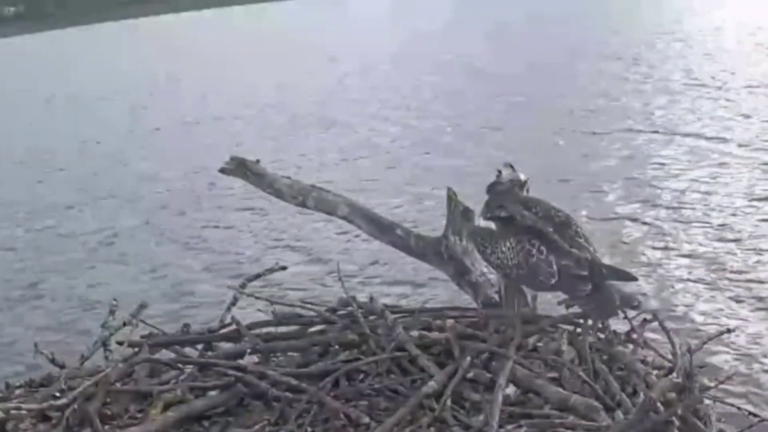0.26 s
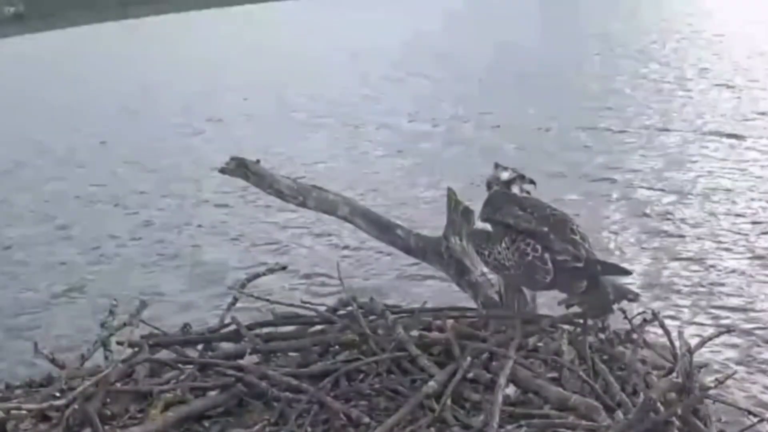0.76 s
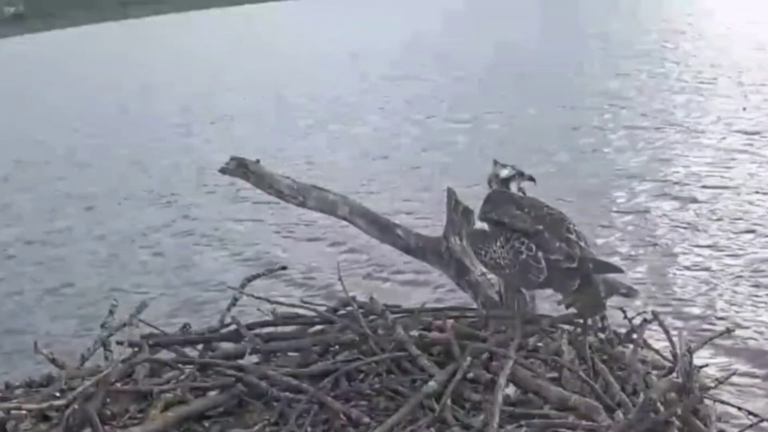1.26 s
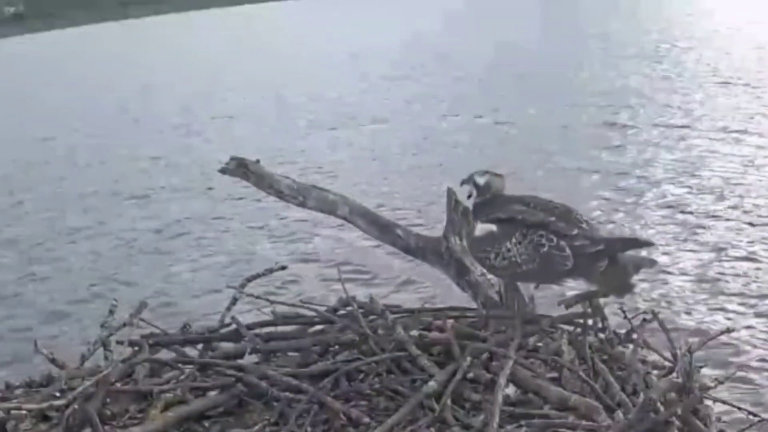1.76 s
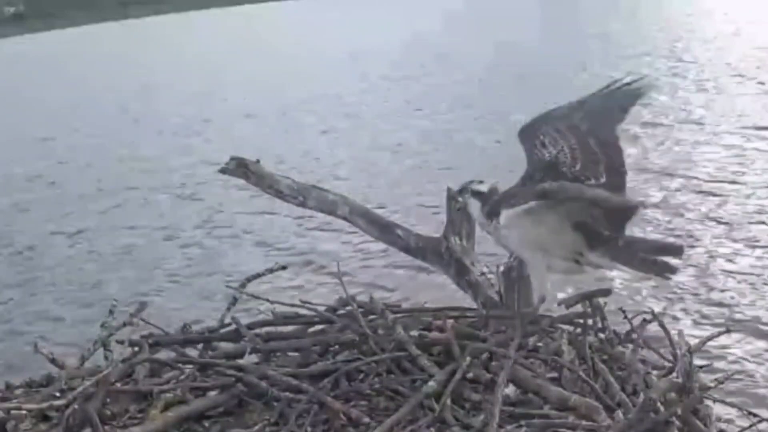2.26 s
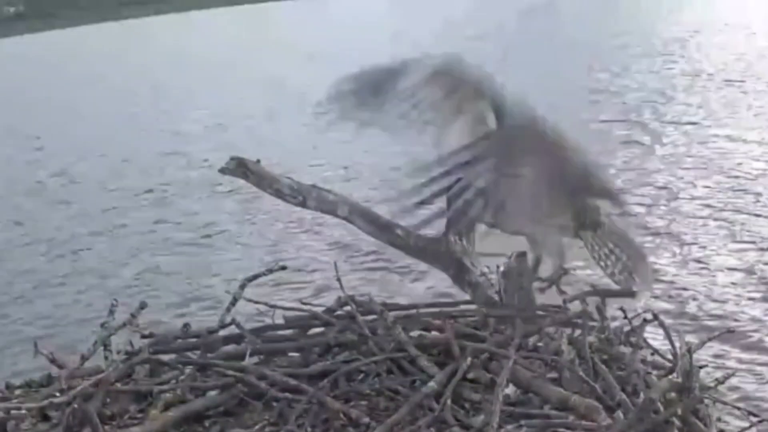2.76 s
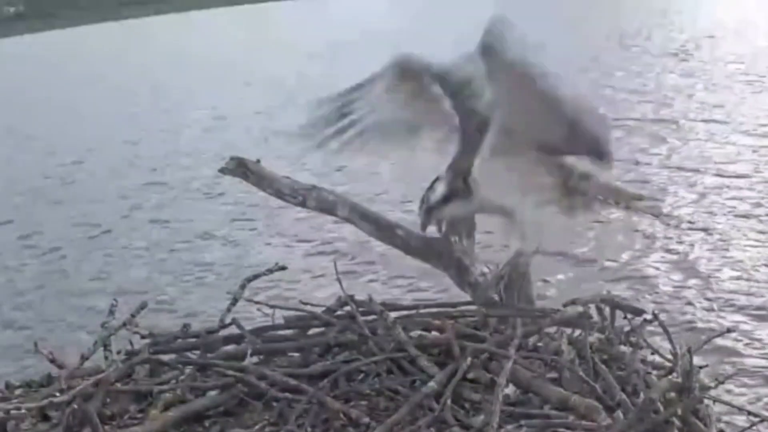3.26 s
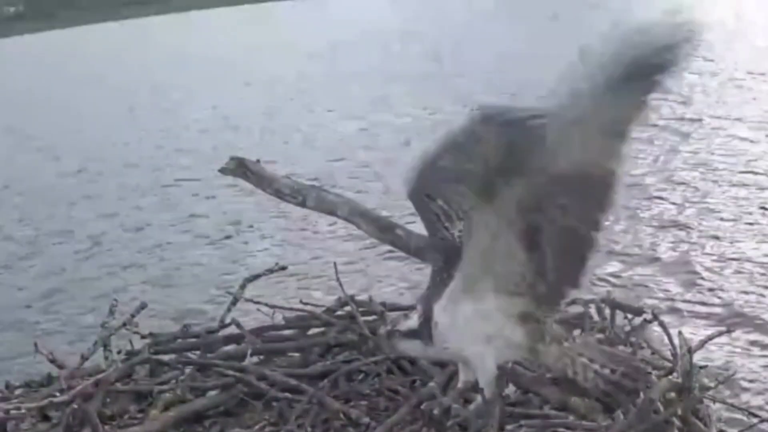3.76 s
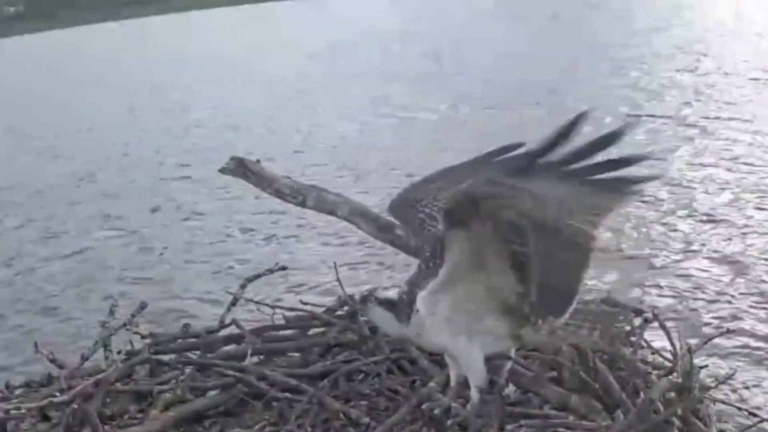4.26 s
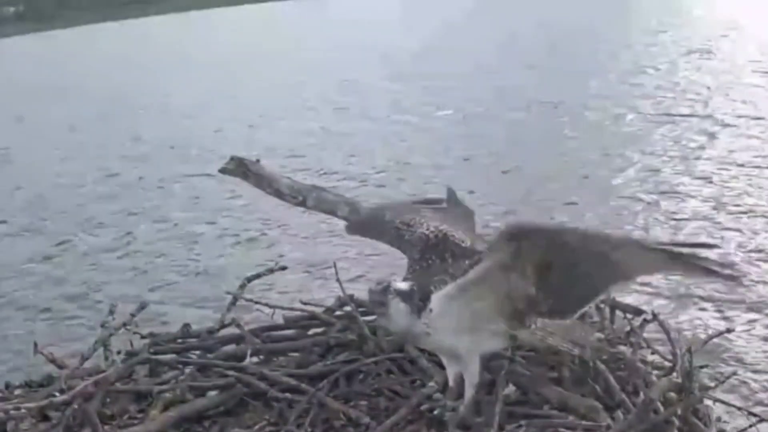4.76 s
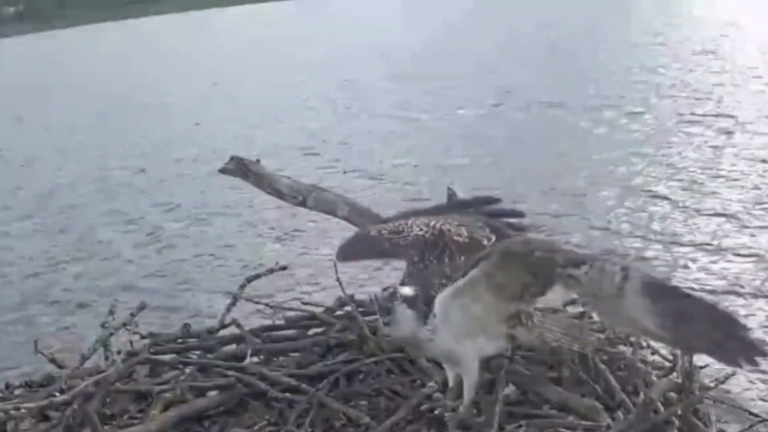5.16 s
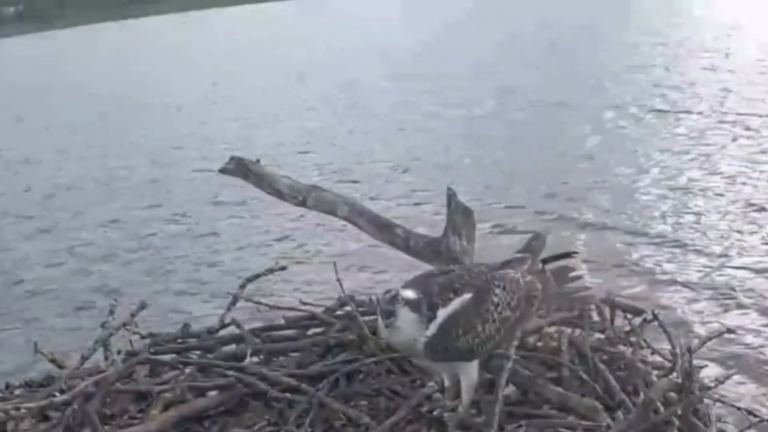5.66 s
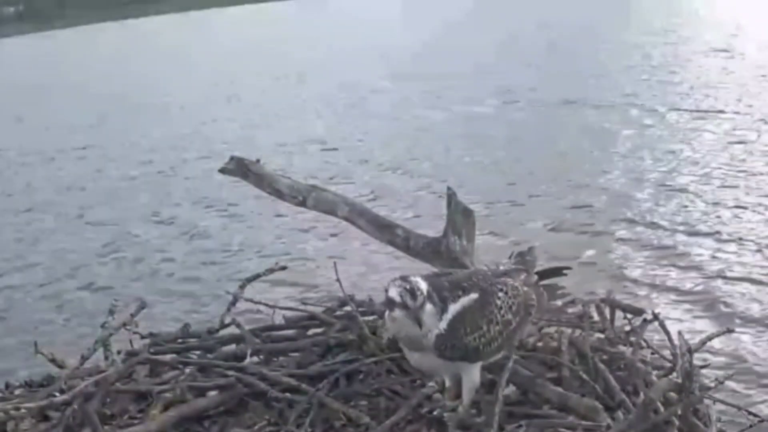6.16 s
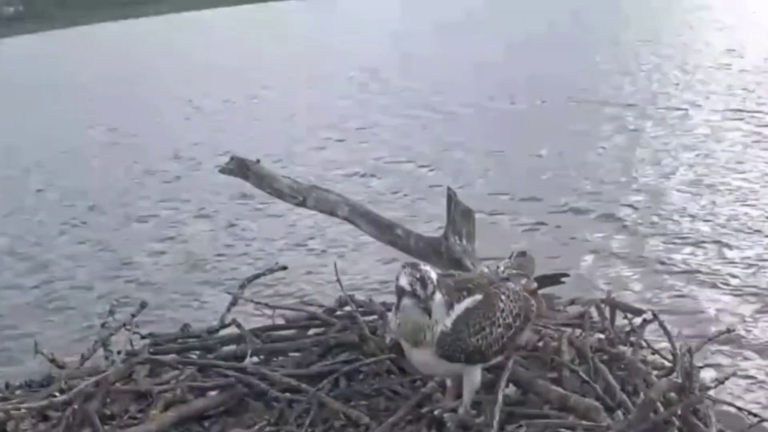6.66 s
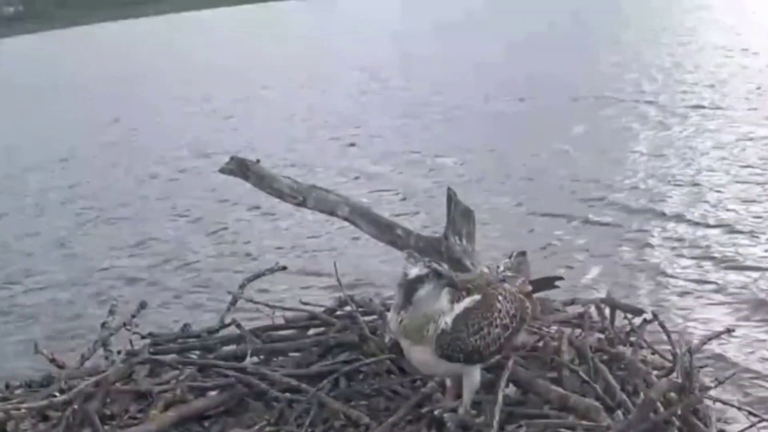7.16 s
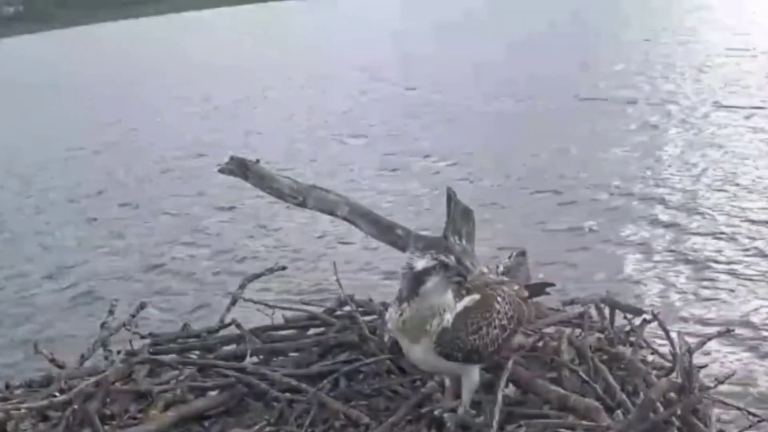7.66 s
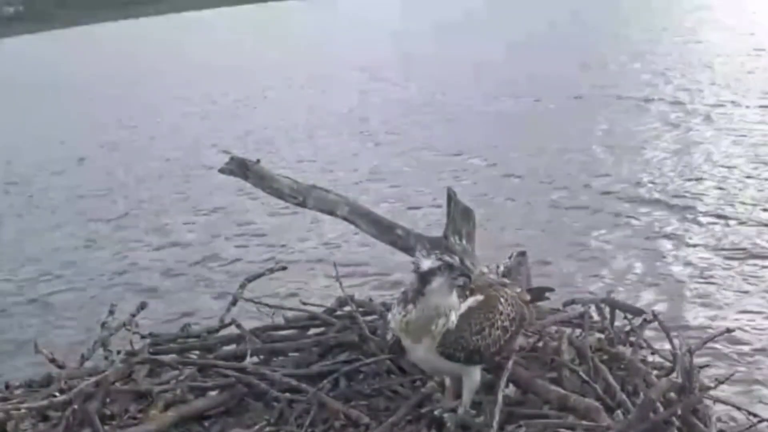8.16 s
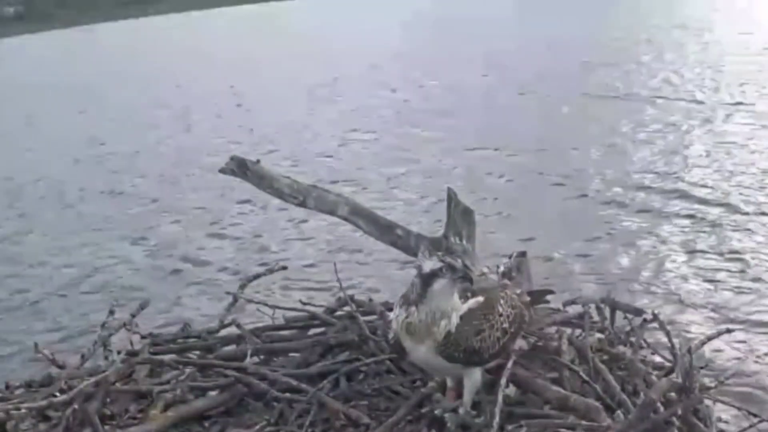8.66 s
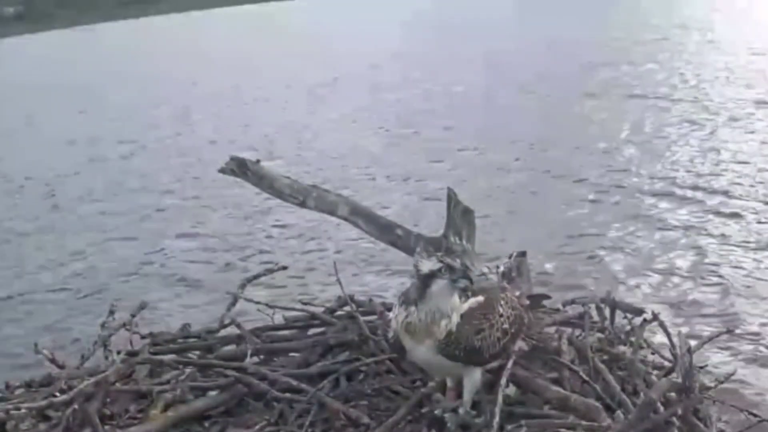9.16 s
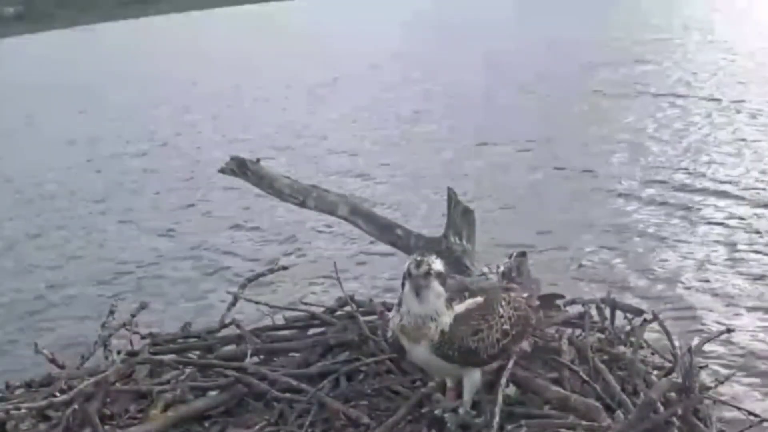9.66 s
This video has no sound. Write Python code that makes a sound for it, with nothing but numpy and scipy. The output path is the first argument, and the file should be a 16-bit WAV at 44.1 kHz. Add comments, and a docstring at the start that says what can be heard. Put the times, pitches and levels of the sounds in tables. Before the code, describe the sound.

Steady, lumpy wind rumble on an outdoor microphone underlies a fish hawk's rapid chirping whistles, each rising slightly and hooking down with a throaty rasp. The calls strengthen through a flurry of movement, then cease, leaving wind, dry twig clicks, light rustle and tiny drips. Near the end come three lower whistles, a gap, and two more. The sound is dry and open, with barely any echo.

```python
"""A stick nest above a lake, where a fish hawk gives runs of short whistled calls close to the microphone.
Its two-sided voice box is additive: phase-driven sines for a main and a second higher whistle, their
sum and difference tones, and narrow noise for a husky low side, with short slides and a throat rasp.
Sticks tick as modal resonators, drops and small bubbles plop as rising glides, feathers and twigs rustle
as clumped clicks, and wind rumbles on the microphone as flickering bands of noise."""
import sys
import numpy as np
from scipy import signal
from scipy.io import wavfile
from scipy.ndimage import uniform_filter1d

SR = 44100
rng = np.random.default_rng(int(sys.argv[2]) if len(sys.argv) > 2 else 0)


def int16_out(signal):
    """Quantize to a 16-bit WAV file."""
    q = np.round(np.clip(np.atleast_2d(signal).T, -1, 1) * 32767)
    wavfile.write(sys.argv[1], SR, q.astype(np.int16))


N = 436149
TIME = np.arange(N) / SR

# Envelope of a whistle: depth below the held level at the start and end, and their times
ATTACK_DB, RELEASE_DB = 32, 37.5
ATTACK_S, RELEASE_S = 0.012, 0.033
# The opening scoop settles; the fall steepens as a power and ends this long before the arch does
SCOOP_S, FALL_BEND, HOOK_LEAD_S = 0.018, 1.5, .012
# Reference heights of the whistles that scale the other partials
MAIN_REFERENCE_DB, EFFORT_REFERENCE_DB = -44.5, -35.5

# Main whistle in arched pieces, one to most calls; a call whose pitch breaks takes three:
#   [onset t/s, climb t/s, fall t/s, opening scoop f/Hz, shoulder f/Hz,
#   crest f/Hz, last f/Hz, shoulder level/dB, crest level/dB, hook level/dB,
#   husky band level/dB and octave overtone level/dB, both before they follow the whistles]
MAIN_ARCHES = [ (0.0, 0.1, 0.085, 25, 2834, 2960, 2825, -58, -61, -57, -59.5, -65),
               (0.355, 0.18, 0.072, 60, 2770, 2977, 2893, -53.5, -52, -53, -57, -45),
               (.802, 0.17, 0.085, 114, 2760, 2935, 2710, -47.5, -50.5, -53.5, -59, -52),
               (1.195, 0.14, 0.052, 60, 2736, 2842, 2652, -44, -45.5, -40.5, -63, -61),
               (1.52, 0.16, 0.067, 160, 2708, 2790, 2707, -39.5, -47, -42.5, -61.5, -63),
               (1.88, .12, .045, 126, 2698, 2932, 2773, -65, -50.5, -46, -52, -57),
               (2.2, 0.1, 0.059, 85, 2682, 2830, 2800, -56, -51, -50, -52.5, -46),
               (2.497, 0.1, 0.073, 47, 2721, 2921, 2899, -44, -43.5, -37.5, -55.5, -65),
               (2.805, 0.078, 0.099, 370, 2910, 2955, 2868, -45.5, -28, -30, -83, -64.5),
               (3.128, 0.059, 0.081, 90, 2496, 2780, 2745, -38.5, -32, -34, -83, -62.5),
               (3.374, 0.069, 0.054, 200, 2800, 2860, 2784, -39, -39, -30, -53, -55.5),
               (3.617, 0.1, 0.083, 59, 2936, 3019, 2865, -33.5, -38, -40, -54, -55.5),
               (3.926, 0.13, 0.023, 420, 2885, 3170, 3160, -40.5, -34, -32, -53, -61),
               (4.074, 0.014, 0.029, 20, 2706, 2750, 2794, -17, -26.5, -40, -76, -57),
               (4.113, 0.0037, 0.075, 10, 3118, 3083, 2770, -48, -27.5, -43, -63, -60),
               (4.39, 0.17, 0.066, 560, 2878, 2968, 2745, -42, -37, -40, -54.5, -60.5),
               (4.788, 0.17, 0.049, 360, 2748, 2957, 2940, -39.5, -39, -29, -54, -59),
               (5.132, 0.13, 0.073, 400, 2898, 2990, 2804, -38, -34.5, -32, -52, -59.5),
               (5.446, 0.12, 0.072, 130, 2881, 2970, 2725, -33.5, -31, -37.5, -53.5, -59.5),
               (5.751, 0.11, 0.082, 92, 2800, 3032, 2804, -31.5, -37, -37, -55, -61),
               (6.056, 0.12, 0.062, 180, 2772, 2973, 2740, -36, -30, -36.5, -53.5, -57),
               (7.959, 0.14, 0.084, 56, 2218, 2652, 2444, -50, -34, -41.5, -60.5, -66.5),
               (8.443, 0.14, 0.076, 420, 2526, 2697, 2415, -34, -40.5, -38, -59.5, -67.5),
               (8.833, 0.13, 0.054, 600, 2637, 2676, 2374, -32.5, -40.5, -32, -59.5, -69),
               (9.493, .16, 0.071, 350, 2515, 2685, 2513, -34, -42, -34.5, -60.5, -67),
               (9.847, 0.073, 0.053, 380, 2596, 2760, 2570, -26, -44, -35, -58, -78)]
# The main whistle catches or flares: [middle t/s, length t/s, level change/dB, pitch pull f/Hz]
MAIN_CATCHES = [(3.24, .02, 2, 0.5), (.368, 0.032, 14, -34), (.82, 0.036, 6, -4), (.91, 0.077, -17, -30.5),
                (1.285, 0.024, -6, 4), (1.67, 0.026, -18, 1), (2.55, .08, -17, -60),
                (2.845, 0.032, 8.5, 34.5), (3.17, 0.012, -13, -0.5), (3.46, 0.032, -8.5, -0.5),
                (3.65, .04, 6.5, -7.5), (3.68, 0.019, -6, -0.5), (4.49, 0.029, -6, 0.5), (4.565, .05, 4, 0),
                (4.88, .035, -3, -22), (4.91, .04, 3.5, 9.5), (4.943, 0.033, -5, 112),
                (5.21, 0.093, 5, 3.5), (5.265, 0.051, -8, -3.5), (5.475, 0.016, -8, -1.5),
                (5.545, .03, -5, -3.5), (5.795, 0.022, -9, 4), (5.865, 0.072, -9, 69),
                (5.895, 0.018, 10, 2.5), (6.11, 0.018, -12, 5.5), (8.03, 0.027, -15, 1),
                (8.11, 0.038, -6, 44.5), (8.142, 0.018, 13, 0.5), (8.61, 0.022, -5, 3),
                (8.624, 0.0085, 10, -5), (8.977, 0.01, -12, -3.5), (8.986, 0.0098, 5.5, -7.5),
                (9.605, 0.025, 8, -6)]


def main_voice():
    """Frequency integration: arched pitch tracks give the main phase, its height and the upper-partial data."""
    arches = [arch(*row) for *row, husky_db, octave_db in MAIN_ARCHES]
    *_, husky_db, octave_db = np.transpose(MAIN_ARCHES)
    phase, height = voice(arches, waver=0.0036, catches=MAIN_CATCHES)
    husk = sum(from_db(level_db) * sounding(piece) for piece, level_db in zip(arches, husky_db))
    octave = sum(from_db(level_db) * sounding(piece) for piece, level_db in zip(arches, octave_db))
    sunk_hz = 0   # distance below the highest pitch so far in the arch
    for piece in arches:
        below_hz = np.maximum.accumulate(piece[:, 1]) - piece[:, 1]
        sunk_hz = sunk_hz + sounding(piece) * np.interp(TIME, piece[:, 0], below_hz)
    return phase, height, husk, octave, sunk_hz


def main_whistle(main, main_height, high_height):
    """Amplitude modulation: an uneven sine with a breathy edge that swells as the high whistle drowns it."""
    flutter, breath_db, breath_hz, break_up_db = .15, -23, 110, 24
    tone = main_height * (1 + flutter * drift(57)) * np.sin(main)
    drowned = high_height / (high_height + main_height + 1e-9)   # share of the high whistle
    edge = from_db(breath_db + break_up_db * drowned) * main_height * noisy_tone(main, breath_hz)
    return tone + edge


# Second, higher whistle, a slow climb: [onset t/s, length t/s, first f/Hz before the scoop, crest f/Hz,
#   early level/dB, late level/dB]
HIGH_WHISTLES = [(0.0, 0.2, 3500, 3580, -47.5, -51.5), (0.347, 0.25, 3445, 3625, -55.5, -51.5),
                 (0.807, 0.23, 3500, 3600, -50.5, -51), (1.181, 0.21, 3470, 3606, -60.5, -53.5),
                 (1.537, 0.12, 3560, 3510, -58.5, -56.5), (1.642, 0.075, 3630, 3650, -48.5, -50),
                 (1.874, 0.18, 3480, 3690, -55.5, -53.5), (2.186, 0.17, 3570, 3680, -47, -55),
                 (2.488, 0.14, 3600, 3730, -50.5, -50.5), (2.805, 0.049, 3650, 3710, -50.5, -53.5),
                 (4.031, 0.11, 3860, 4030, -59, -47.5), (4.929, 0.032, 3980, 4020, -44, -54),
                 (5.849, 0.042, 3900, 3900, -45, -49.5), (8.111, 0.041, 3316, 3340, -45, -66),
                 (8.552, 0.079, 3420, 3460, -54, -50), (8.903, 0.08, 3420, 3450, -54, -57.5),
                 (9.613, 0.081, 3420, 3524, -47, -53.5)]
CLIMB_SHARE, SAG_HZ, HIGH_SCOOP_HZ = 0.74, 29.3, 49.6   # part spent climbing; drop after the crest; scoop
HIGH_ATTACK_S, HIGH_RELEASE_S = 0.0064, 0.024   # it cuts in and out sharply


def high_voice():
    """Frequency integration: the second source has its own pitch track, hence its own phase and height."""
    arches = []
    for s, length, first_hz, crest_hz, early_db, late_db in HIGH_WHISTLES:
        climb, fall = CLIMB_SHARE * length, (1 - CLIMB_SHARE) * length
        arches.append(arch(s, climb, fall, HIGH_SCOOP_HZ, first_hz, crest_hz, crest_hz - SAG_HZ,
                           early_db, late_db, late_db, HIGH_ATTACK_S, HIGH_RELEASE_S))
    return voice(arches, waver=0.003)


def high_whistle(main, high, high_height):
    """Narrow-band noise about a sine gives the high whistle its breathy edge; a hoarse band lies beneath."""
    hoarse_ratio, hoarse_width_hz, hoarse_db = .84, 210, -5.5   # ratio to main pitch; level over high whistle
    tone = high_height * from_db(3.1 * drift(46)) * np.sin(high)
    edge = from_db(-16.5) * high_height * noisy_tone(high, 150)
    hoarse = from_db(hoarse_db) * high_height * noisy_tone(hoarse_ratio * main, hoarse_width_hz)
    return tone + edge + hoarse


# Upper harmonics of the main whistle: [multiple, level/dB over the octave, before the throat filter]
MAIN_OVERTONES = [(3, -16), (4, -15.5), (5, -9)]


def overtones(main, main_height, high_height, octave, sunk_hz):
    """Harmonic series: whole multiples of the main phase, which give way while the high whistle sounds."""
    follow_power, half_db = 1.48, -56   # power of the main height; high level at which they have halved
    hook_db_per_hz = 0.0317   # swell as the pitch hooks down
    flutter_db, blur = 2.6, .3   # unevenness of the octave's level and phase (rad)
    follow = np.clip(main_height / from_db(MAIN_REFERENCE_DB), 0, 3) ** follow_power
    give_way = 1 + (high_height / from_db(half_db)) ** 2
    height = octave * follow / give_way * from_db(hook_db_per_hz * sunk_hz)
    out = height * from_db(flutter_db * drift(120)) * np.sin(2 * main + blur * drift(90))
    for multiple, level_db in MAIN_OVERTONES:
        overtone = height * from_db(level_db + 4.5 * drift(47)) * np.sin(multiple * main)
        out += band(overtone, 7800, 9700)   # the throat passes them best below 10 kHz
    return out


# Combination tones: [multiple of main, multiple of high, level/dB over the high whistle, before the
#   main height weights it]
MIXED_TONES = [(0, 2, -4), (1, 1, -6.5), (-1, 2, -16), (-1, 3, -18), (2, 1, -24), (1, 2, -25.5)]


def mixed_tones(main, main_height, high, high_height):
    """Intermodulation: two coupled sources sound at sums and differences of their frequencies."""
    out = 0
    for of_main, of_high, level_db in MIXED_TONES:
        weight = np.clip(main_height / from_db(MAIN_REFERENCE_DB), 0, 2.5) ** (0.55 * abs(of_main))
        flutter = from_db(level_db + 3.0 * drift(59))
        out = out + high_height * weight * flutter * np.sin(of_main * main + of_high * high)
    return out


# Noisy bands of the low side: [multiple of main, multiple of low, level/dB over the effort,
#   corner of each band's modulating noise f/Hz]
HUSKY_BANDS = [(0, 1, 2, 140), (1, 0, 9, 62.96), (0, 2, -23.5, 91), (1, 1, -23.5, 60), (1, 2, -19, 120),
               (2, 1, -13.5, 70)]


def husky_low_side(main, low, effort):
    """Narrow-band noise: the low side flutters unevenly and intermodulates with the main whistle."""
    out = 0
    for of_main, of_low, level_db, width_hz in HUSKY_BANDS:
        flutter = from_db(level_db + 2.84 * drift(25))
        out = out + effort * flutter * noisy_tone(of_main * main + of_low * low, width_hz)
    return out


# The low side slides up to open a call: [onset t/s, first f/Hz, last f/Hz, length t/s, starting level/dB]
OPENING_SLIDES = [(0.344, 1860, 2200, 0.017, -33.5), (0.792, 1890, 2200, 0.024, -35.5),
                  (1.181, 2080, 2220, 0.024, -37.5), (1.515, 1910, 2300, 0.042, -46),
                  (1.867, 2140, 2360, 0.026, -35.5), (2.186, 2200, 2520, 0.011, -46),
                  (2.479, 2175, 2350, 0.028, -32), (2.801, 2290, 2510, 0.036, -43.5),
                  (3.116, 2040, 2170, 0.041, -38.5), (3.356, 2030, 2375, 0.048, -37.5),
                  (3.594, 2020, 2340, .056, -30.5), (5.125, 1960, 2164, 0.027, -46),
                  (5.433, 1875, 2190, 0.028, -32.5), (5.743, 1900, 2210, 0.023, -28),
                  (6.051, 1997, 2130, 0.033, -33)]
# It drops away to close one: [onset t/s, first f/Hz, last f/Hz, starting level/dB]
CLOSING_SLIDES = [(2.029, 2500, 2230, -44), (2.322, 2630, 2320, -40), (4.147, 2610, 2230, -46),
                  (4.591, 2226, 1940, -59), (4.978, 2160, 1517, -55), (5.301, 2316, 2010, -50),
                  (5.605, 2280, 2030, -52), (5.905, 2304, 1610, -56), (6.208, 2480, 2150, -42),
                  (8.146, 1914, 1745, -43), (8.622, 2047, 1830, -45), (8.988, 2000, 1760, -41),
                  (9.68, 2075, 1800, -42)]


def slides():
    """Frequency glides, broken up by noise modulation, each opening one preceded by a puff of air."""
    closer_s, flutter_db, scratch = 0.023, 2.0, .2   # scratch: depth of fast unevenness
    puff_lead_s, puff_s, puff_db = .005, .02, -19   # middle before the slide; length; level over the slide
    closers = [(s, first_hz, last_hz, closer_s, level_db) for s, first_hz, last_hz, level_db in CLOSING_SLIDES]
    tones = glides(OPENING_SLIDES + closers, bend=0.6, fall_db=5.5, octave_db=12.5, edge=.3)
    tones = tones * from_db(flutter_db * drift(110)) * (1 + scratch * drift(250))
    puffs = sum(from_db(level_db + puff_db) * bump(s - puff_lead_s, puff_s)
                for s, *_, level_db in OPENING_SLIDES)
    return tones + puffs * rms_one(band(rng.standard_normal(N), 1700, 2580))


# Colour of the air in the throat: [f/Hz, relative density level/dB per Hz]
RASP_COLOUR = [(1500, -8.5), (2300, 4), (3200, -5.5), (4800, -0.5), (6500, 3.5), (8500, -6), (11000, -15.5),
               (15000, -45)]


def rasp(main, low, main_height, high_height, effort):
    """Turbulence: coloured noise scaled by airflow, a compressed product of whistle height and effort."""
    airflow = (main_height + high_height) ** 0.45 * effort ** 0.45
    airflow = uniform_filter1d(airflow, size=SR // 30)
    breath = coloured(RASP_COLOUR, patchy_db=1.0, rate=17, grains=streaks(main, low))
    return from_db(-19) * airflow * breath


def streaks(main, low):
    """Intermodulation: noisy lines at sums and differences of both sides' pitches, over plain air."""
    width_hz, air = 95, .9   # corner of the modulating noise; air relative to the lines
    orders = [(m, n) for m in range(-1, 5) for n in range(-1, 6) if n and 2 <= m + n <= 5]
    lines = sum(drift(width_hz) * np.sin(m * main + n * low) for m, n in orders)
    return rms_one(lines) + air * rng.standard_normal(N)


def hawk():
    """Superposition: both whistles, their partials, the low side, slides and rasp add linearly."""
    low_ratio, low_sink = .79, 0.94   # low pitch over the main; it sinks further as the breath runs out
    main, main_height, husk, octave, sunk_hz = main_voice()
    high, high_height = high_voice()
    low = low_ratio * main - low_sink * 2 * np.pi * np.cumsum(sunk_hz) / SR
    effort = husk * np.clip((main_height + high_height) / from_db(EFFORT_REFERENCE_DB), 0, 1) ** 0.72
    out = main_whistle(main, main_height, high_height)
    out += high_whistle(main, high, high_height)
    out += overtones(main, main_height, high_height, octave, sunk_hz)
    out += mixed_tones(main, main_height, high, high_height)
    out += husky_low_side(main, low, effort)
    return out + slides() + rasp(main, low, main_height, high_height, effort)


def voice(arches, waver, catches=()):
    """Phase as the integral of frequency: a slightly wavering pitch, silent between arches."""
    rows = np.concatenate(arches)
    height = sum(sounding(piece) * from_db(np.interp(TIME, piece[:, 0], piece[:, 2])) for piece in arches)
    pitch = np.interp(TIME, rows[:, 0], rows[:, 1]) * (1 + waver * drift(59))
    for s, length, change_db, pull_hz in catches:
        catch = bump(s, length)
        height = height * from_db(change_db * catch)
        pitch = pitch + pull_hz * catch
    return 2 * np.pi * np.cumsum(pitch) / SR, np.sqrt(2) * height   # rms to peak


def arch(start, climb, fall, scoop_hz, shoulder_hz, crest_hz, last_hz, shoulder_db, crest_db, hook_db,
         attack_s=ATTACK_S, release_s=RELEASE_S):
    """Piecewise pitch contour, rows [t/s, f/Hz, level/dB]: a scoop, a steady climb, then a hook down."""
    age = np.arange(0, climb + fall, .002)
    fallen = np.clip((age - climb) / max(fall - HOOK_LEAD_S, fall / 2), 0, 1) ** FALL_BEND
    hz = np.interp(age, [0, climb], [shoulder_hz, crest_hz])
    hz = hz - scoop_hz * np.exp(-age / SCOOP_S) - (crest_hz - last_hz) * fallen
    hook = climb + max(fall - release_s, fall / 3)
    level_db = np.interp(age, [0, climb, hook, hook + release_s],
                         [shoulder_db, crest_db, hook_db, hook_db - RELEASE_DB])
    attack_db = ATTACK_DB * np.exp(-age / attack_s) * (start > 0)   # no soft attack at time zero
    return np.transpose([start + age, hz, level_db - attack_db])


def sounding(piece):
    """Gating: one while an arch lasts, with quick linear fades."""
    return np.clip(np.minimum(TIME - piece[0][0] + 0.0011, piece[-1][0] - TIME) / 0.0058, 0, 1)


# Sticks and claws: [onset t/s, tick level/dB, knock level/dB above the tick, stick pitch f/Hz]
STICK_TICKS = [(.2743, -64, -9, 2200), (0.63, -69, 14, 2585), (0.7091, -60, -4, 2300),
               (0.9356, -48, -13, 2684), (1.0027, -48, -12.5, 2170), (1.225, -45.5, -4, 2300),
               (1.2612, -53, -28, 2900), (1.7355, -55, -2, 2120), (1.743, -65, 12, 1970),
               (3.342, -60, -1, 2390), (3.245, -62, 9, 2080), (3.478, -45.5, 6, 2300),
               (4.253, -58, -8, 2000), (4.6236, -53, -5, 2640), (4.8879, -45, -1, 2290),
               (4.9043, -43, -3.5, 2235), (5.035, -58, -1, 2090), (6.433, -57.5, -14, 2900),
               (6.472, -66, 7, 2000), (6.4887, -62, 12, 2400), (6.498, -69, 7, 3050),
               (6.512, -49.5, -3.5, 3260), (6.555, -64.5, -20, 2880), (6.732, -63.5, -20, 2870),
               (6.7024, -59, 1, 2000), (6.804, -72, 4, 2200), (6.906, -64.5, -1, 5040),
               (6.99, -67, -5, 3300), (7.004, -63, 10, 1970), (7.042, -65, 8, 3240), (7.0622, -63, 5, 3290),
               (7.111, -65, 4, 2050), (7.226, -67, 5, 2730), (7.234, -69, -20, 2900),
               (7.295, -60, -19, 2900), (7.374, -65, 6, 2850), (7.434, -59.5, 1, 2600),
               (7.493, -63.5, 3.5, 2000), (7.51, -62, 0, 2080), (7.57, -64, -12, 4910),
               (7.68, -63.5, -6, 2400), (8.217, -58, -9, 2500), (8.411, -67, 7.5, 3090),
               (8.481, -50, -8, 3300), (8.6625, -59, -8, 2300), (8.7912, -49, -14.5, 2940),
               (9.1365, -50.5, 1, 2160), (9.197, -59, 4.5, 2190), (9.223, -55, 3, 2440),
               (9.742, -58, -5, 2300)]
# Modes of a stick: [multiple of its pitch, level/dB, T60 t/s]
STICK_MODES = [(0.521, 9, 0.023), (.78, 0.5, 0.034), (1.0, 6, .03), (1.269, -15, 0.012), (1.9, -7, 0.011)]


def sticks():
    """Modal synthesis: a bright noise crack and a knock of decaying modes pitched for each stick."""
    tick_t60_s, low_hz, high_hz = 0.037, 5200, 8600   # decay; range of the drawn crack pitch
    out, age = np.zeros(N), TIME[:SR // 10]
    for s, peak_db, knock_db, stick_hz in STICK_TICKS:
        hz = rng.uniform(low_hz, high_hz)
        noise = rng.standard_normal(len(age))
        burst = noise * np.abs(noise) * from_db(peak_db - 60 * age / tick_t60_s) * np.clip(age / 0.0028, 0, 1)
        crack = band(burst, hz / 1.15, min(hz * 1.64, 10800)) + from_db(-3.0) * band(burst, 2500, 9700)
        knock = 0
        for multiple, level_db, t60 in STICK_MODES:
            mode_db = peak_db + knock_db + level_db + rng.normal(0, 3.7)
            mode_hz = multiple * rng.normal(1, 0.076) * stick_hz
            knock = knock + from_db(mode_db - 60 * age / t60) * np.sin(2 * np.pi * mode_hz * age)
        out[round(s * SR):][:len(age)] += crack + knock * np.clip(age / .0015, 0, 1)
    return band(out, 300, 10500)   # ticks are dull above the upper edge


# Larger plops: [onset t/s, first f/Hz, last f/Hz, starting level/dB]
LARGE_DROPS = [(1.158, 1140, 1980, -48), (1.776, 1210, 2530, -40), (4.258, 790, 1706, -29),
               (6.473, 1165, 1270, -47), (6.512, 1170, 1420, -38.5), (6.69, 1267, 1510, -39),
               (7.214, 1260, 1250, -43.5), (8.054, 966, 1266, -35), (8.074, 738, 1336, -37),
               (8.12, 923, 1620, -34), (8.933, 1040, 1256, -41)]


def drops():
    """Bubble resonance: the pitch climbs toward the surface as the ring dies; small ones come at random."""
    when, size, climb, strength = rng.random((300, 4)).T
    first_hz = 800 * 3.0 ** size
    last_hz = first_hz * (1 + 0.56 * climb)
    length_s = 8.4 / first_hz   # higher bubbles ring more briefly
    small = np.transpose([when * (N / SR - .1), first_hz, last_hz, length_s, -62 + 12 * strength - 8 * size])
    large = [(s, low_hz, high_hz, 0.029, level_db) for s, low_hz, high_hz, level_db in LARGE_DROPS]
    return glides([*large, *small], bend=2.4, fall_db=17.0, octave_db=10.0, edge=0.015)


def glides(rows, bend, fall_db, octave_db, edge):
    """Exponential frequency glide; the octave grows with the square of the height, as in weak distortion."""
    out = np.zeros(N)
    for s, first_hz, last_hz, length, level_db in rows:
        age = np.arange(round(length * SR)) / (length * SR)   # share of the length
        phase = 2 * np.pi * np.cumsum(first_hz * (last_hz / first_hz) ** (age ** bend)) / SR
        fades = np.clip(np.minimum(age, (1 - age) / 0.43) / edge, 0, 1)   # edge: share spent fading in
        shape = from_db(level_db - fall_db * age) * fades
        octave = from_db(octave_db) * shape * np.sin(2 * phase)
        out[round(s * SR):][:len(age)] += shape * (np.sin(phase) + octave)
    return out


def echo(x):
    """Convolution with decaying noise: a faint smeared tail from the nest, the perch and the water."""
    t60_s, level_db = 0.25, -24
    t = TIME[:SR // 2]
    tail = rng.standard_normal(len(t)) * from_db(-60 * t / t60_s) * (t > .006)
    return from_db(level_db) * signal.fftconvolve(x, tail / np.linalg.norm(tail))[:N]


# Colour of the rustle: [f/Hz, relative density level/dB per Hz]
RUSTLE_SPECTRUM = [(1760, -12), (3000, -1), (4380, -5.5), (5230, -6), (7280, -8.5), (9320, 2), (15500, -34)]
# Bouts of feathers and twigs: [middle t/s, length t/s, level/dB at the middle, added to the steady stir]
RUSTLE_BOUTS = [(0.034, 0.44, -61), (0.823, 0.99, -79), (1.29, 0.21, -67), (1.814, 0.25, -84),
                (3.566, 0.35, -79), (4.438, 0.33, -79), (5.046, 0.12, -70), (5.241, 0.22, -68),
                (6.5, 0.1, -69), (6.757, 0.32, -74.5), (7.002, 0.059, -70), (7.074, 0.077, -66.5),
                (7.299, 1, -89.5), (7.564, 0.037, -68), (7.738, 0.083, -69), (8.136, 0.54, -69.5),
                (8.787, 0.086, -65), (8.97, 0.37, -68), (9.214, 0.12, -64.5), (9.784, 0.19, -66.5)]


def rustle():
    """Granular shot noise: clumps of tiny clicks over a thin hiss; each bout swells and fades."""
    clump_db, clicks_per_s = 4.5, 1500   # unevenness of the bunching; middle rate
    stir_db, hiss_db, crackle_db = -85.5, -80.0, -5   # between bouts; steady hiss; snaps over the clicks
    sizes = from_db(1.5 * np.minimum(rng.exponential(1, N), 5)) * rng.standard_normal(N)
    clicks = sizes * (rng.random(N) < clicks_per_s * from_db(clump_db * drift(16)) / SR)
    grains = 0.086 * rng.standard_normal(N) + clicks
    hiss = from_db(hiss_db) * coloured(RUSTLE_SPECTRUM, patchy_db=6.0, rate=8)
    stir = from_db(stir_db) + sum(from_db(level_db) * bump(s, length) for s, length, level_db in RUSTLE_BOUTS)
    rustling = coloured(RUSTLE_SPECTRUM, patchy_db=1.5, rate=12, grains=grains)
    return hiss + stir * (rustling + from_db(crackle_db) * crackle())


def crackle():
    """Impulse-excited resonance: sparse twig snaps, each ringing briefly at one of 14 pitches; rms 1."""
    snaps_per_s, t60_cycles = 120, 24
    snaps = from_db(3.5 * np.minimum(rng.exponential(1, N), 4)) * (rng.random(N) < snaps_per_s / SR)
    dealt, out = rng.integers(0, 14, N), 0
    for k, hz in enumerate(np.geomspace(4500, 10500, 14)):
        r, w = from_db(-60 * hz / (t60_cycles * SR)), 2 * np.pi * hz / SR   # pole radius and angle
        struck = snaps * (dealt == k) + 1e-18
        out = out + signal.lfilter([0, np.sin(w)], [1, -2 * r * np.cos(w), r * r], struck)
    return rms_one(out)


# Wind: [t/s, rumble level/dB, rush level/dB]
WIND_GUSTS = [(0.0, -21, -34.5), (0.36, -19.5, -33.5), (0.85, -21, -35), (1.24, -18.5, -26.5),
              (2.12, -23, -28), (2.42, -16, -22), (2.67, -20.5, -28.5), (3.5, -22, -27.5),
              (3.96, -23, -32.5), (4.38, -21, -31.5), (4.74, -21.5, -32), (4.98, -22.5, -27.5),
              (5.67, -22, -30), (6.42, -21.5, -31), (6.61, -19, -32), (6.75, -19.5, -24.5), (7.3, -22, -32),
              (7.68, -19, -27), (7.93, -23.5, -29.5), (8.45, -20, -29), (8.79, -20, -30),
              (9.28, -22.5, -34), (9.59, -17.5, -29.5), (9.89, -21.5, -25.5)]
# Colour of the rumble: [f/Hz, relative density level/dB per Hz]
RUMBLE_COLOUR = [(8.8, -24.5), (15, 1), (38, 5.5), (70, 5), (133, -1), (177, -11), (206, -12), (236, -17.5),
                 (300, -17.5), (390, -53.5), (660, -120)]
# Colour of the rush: [f/Hz, relative density level/dB per Hz]
RUSH_COLOUR = [(88, -39.5), (150, 5.5), (389, -16.5), (431, -17.5), (1070, -32.5), (2300, -78),
               (5000, -100), (6500, -100), (11000, -120)]


def wind():
    """Turbulent pressure as coloured noise: a lumpy rumble on the capsule and a rush above it."""
    s, rumble_db, rush_db = np.transpose(WIND_GUSTS)
    rumble = from_db(np.interp(TIME, s, rumble_db)) * coloured(RUMBLE_COLOUR, patchy_db=1.5, rate=16.0)
    rush = from_db(np.interp(TIME, s, rush_db)) * coloured(RUSH_COLOUR, patchy_db=1.6, rate=6.1)
    return band(rumble + rush, 8.0, 2700)


def coloured(spectrum, patchy_db, rate, grains=None):
    """Subtractive synthesis: half-octave bands of noise, each flickering partly with the others; rms 1."""
    hz, level_db = np.transpose(spectrum)
    edges = hz[0] * 2 ** np.arange(0, np.log2(hz[-1] / hz[0]) + .01, .5)
    # opposite signs add up where bands meet
    white = rng.standard_normal((2, N)) if grains is None else [grains, -grains]
    out, together = 0, drift(rate)
    for k, (low, high) in enumerate(zip(edges, edges[1:])):
        centre_db = np.interp(np.log(low * high) / 2, np.log(hz), level_db)
        flicker_db = patchy_db * (together + 0.89 * drift(rate))
        out = out + from_db(centre_db + flicker_db) * band(white[k % 2], low, high)
    return rms_one(out)


def noisy_tone(phase, width_hz):
    """Quadrature modulation: two independent slow noises spread a tone into a narrow band."""
    return drift(width_hz) * np.sin(phase) + drift(width_hz) * np.cos(phase)


def drift(rate):
    """Low-pass random process of spread 1: noise twice through a one-pole filter with its corner at rate/Hz."""
    r = np.exp(-40 * np.pi * rate / SR)   # runs at a twentieth of the sample rate
    slow = signal.lfilter([1], [1, -2 * r, r * r], rng.standard_normal(N // 20 + 4002))[4000:]
    return np.interp(np.arange(N) / 20, np.arange(len(slow)), rms_one(slow))


def bump(s, length):
    """Window function: a smooth hump of height one about its middle."""
    return np.clip(1 - (2 * (TIME - s) / length) ** 2, 0, 1) ** 2


def band(x, low_hz, high_hz):
    """Butterworth band-pass: maximally flat between its edges."""
    return signal.sosfilt(signal.butter(2, [low_hz, high_hz], "band", fs=SR, output="sos"), x)


def from_db(db):
    """Logarithmic level: decibels to amplitude gain."""
    return 10 ** (np.asarray(db) / 20)


def rms_one(x):
    """Power normalisation: scaled to unit mean square."""
    return x / np.sqrt(np.mean(x ** 2) + 1e-20)


def scene():
    """Superposition of bird, nest, water and wind at one microphone."""
    near = hawk() + sticks() + drops()
    return (near + echo(near) + rustle() + wind())[None]


def record(dry):
    """Band limiting: the last instant fades, and a Chebyshev low-pass cuts the top steeply."""
    faded = dry * np.clip(TIME[::-1] / .004, 0, 1)
    return signal.sosfilt(signal.cheby2(12, 70, 16200, fs=SR, output="sos"), faded)


dry = scene()
out = record(dry)
int16_out(out)
```